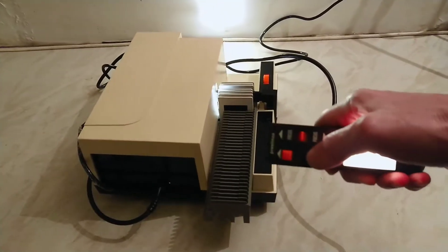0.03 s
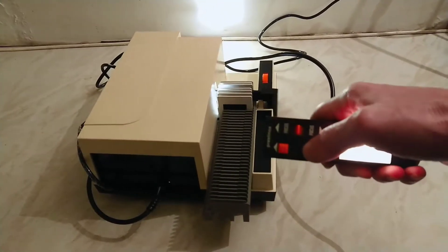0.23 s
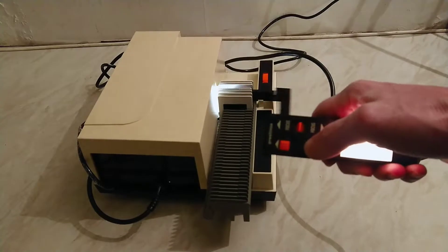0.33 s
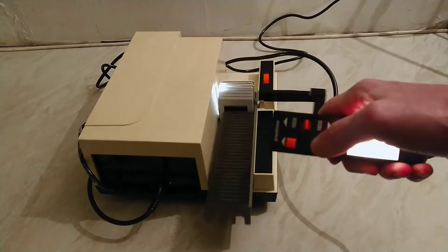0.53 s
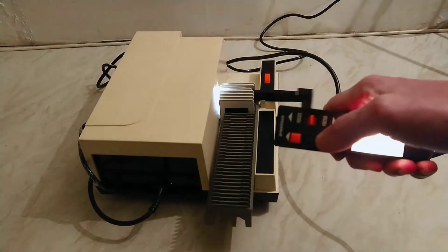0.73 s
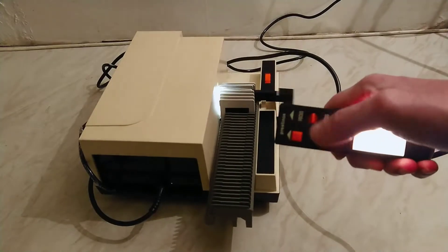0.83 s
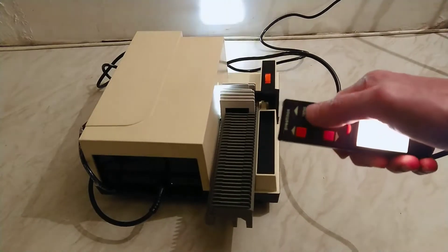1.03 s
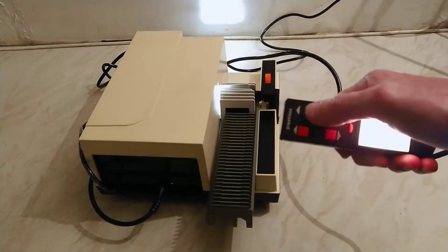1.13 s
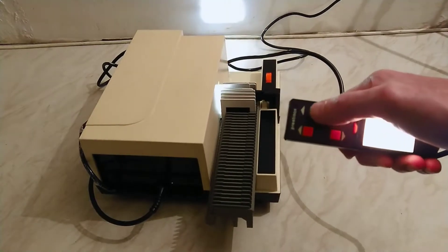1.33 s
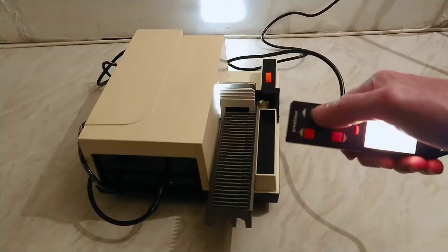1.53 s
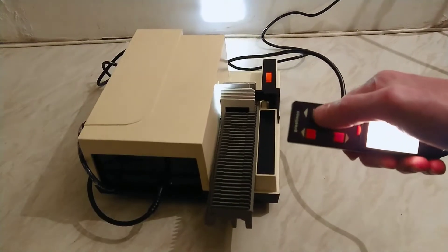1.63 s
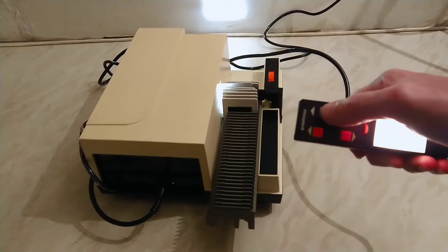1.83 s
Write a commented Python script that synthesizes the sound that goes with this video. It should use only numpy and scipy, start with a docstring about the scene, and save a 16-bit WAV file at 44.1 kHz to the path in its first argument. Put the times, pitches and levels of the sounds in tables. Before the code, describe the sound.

A slide projector changes one slide with plastic clacks and a whirr over its humming fan.

```python
"""A slide projector changes one slide

A cooling fan hums throughout. A steel latch snaps in, and a geared motor drives the slide arm
out and back with plastic clacks and scrapes. The machine bounces on the hard floor, then its
mechanism drops to rest with a last clack. A small bare room echoes the clacks, scrapes and ticks."""
import sys
import numpy as np
from scipy import signal
from scipy.fft import rfft, irfft, next_fast_len
from scipy.io import wavfile
from scipy.ndimage import map_coordinates

SR = 44100
rng = np.random.default_rng(int(sys.argv[2]) if len(sys.argv) > 2 else 0)


def dump(signal):
    """Clip the signal to [-1, 1] and save it as 16-bit WAV at the path in sys.argv[1]."""
    limited = np.clip(np.atleast_2d(signal).T, -1, 1)
    pcm = np.round(limited * 32767).astype(np.int16)
    wavfile.write(sys.argv[1], SR, pcm)


N = 83790

# How hard the motor works. Each row: time in seconds, load from 0 to 1.
MOTOR_LOAD = [(.25, 0.02), (.38, 1), (.7, 1), (1.0, 0.58), (1.12, 0)]


def amp(db):
    """Turn decibels (dB) into a multiplier."""
    return 10 ** (np.asarray(db) / 20)


def unit(x):
    """Scale a signal to an average power of 1."""
    return x / np.sqrt(np.mean(x ** 2) + 1e-20)


def along(points, hz):
    """Read between rows of (Hz, value) on a scale of octaves."""
    f, values = np.transpose(points)
    return np.interp(np.log(hz + 1), np.log(f + 1), values)


def curves(rows):
    """Join timed rows with straight lines: one curve for each column after the time."""
    times, *columns = np.transpose(rows)
    return [np.interp(np.arange(N) / SR, times, column) for column in columns]


def wobble(rate):
    """A smooth random curve through `rate` points a second."""
    return map_coordinates(rng.standard_normal(N // 8), [np.arange(N) * rate / SR + 2], mode="wrap")


def filtered(x, response):
    """Multiply each frequency f in x by response(f)."""
    n = x.shape[-1]
    padded = next_fast_len(n + 8192)
    return irfft(rfft(x, padded) * response(np.fft.rfftfreq(padded, 1 / SR)), padded)[..., :n]


def resonances(table, f):
    """How a body responds at frequency f, given rows of (pitch in Hz, width in Hz, dB)."""
    return sum((-1) ** k * amp(db) * 1j * f * width / (hz * hz - f * f + 1j * f * width)
               for k, (hz, width, db) in enumerate(table))


def noise(colour):
    """Two unrelated noises shaped by rows of (Hz, dB)."""
    return unit(filtered(rng.standard_normal((2, N)), lambda f: amp(along(colour, f))))


def narrow_noise(hz, width):
    """Two unrelated noises gathered around one pitch."""
    return unit(filtered(rng.standard_normal((2, N)), lambda f: resonances([(hz, width, 0)], f) ** 2))


def add(out, start, x):
    """Mix x into out from `start` seconds on."""
    part = out[..., max(round(start * SR), 0):][..., :x.shape[-1]]
    part += x[..., :part.shape[-1]]


def burst(t, db, ring_s, rise_s):
    """A quick swell and a fade. The ring time is how long a fade of 60 dB takes."""
    return amp(db - 60 * t / ring_s) * (1 - np.exp(-t / rise_s))


def struck(modes, hits, rise_s=0.00092):
    """A struck part rings at its own pitches, a little differently each time."""
    # Each row of modes: pitch in Hz, level in dB, ring time in seconds.
    # Each row of hits: start in seconds, level in dB.
    out, t = np.zeros((2, N)), np.arange(SR // 3) / SR
    for start, db in hits:
        for hz, mode_db, ring_s in modes:
            phase = rng.uniform(0, 2 * np.pi) + np.array([[0], [rng.choice([-1, 1]) * np.pi / 2]])
            level = burst(t, db + mode_db + rng.standard_normal(), ring_s, rise_s)
            add(out, start, level * np.sin(2 * np.pi * hz * t + phase))
    return out


def motor_tones(tones, sag_share=.026, waver_hz=2.5):
    """Wavering tones that drop in pitch as the load slows the motor."""
    load, = curves(MOTOR_LOAD)
    out = np.zeros((2, N))
    for hz, db in tones:
        cycles = np.cumsum(hz * (1 - sag_share * load) + waver_hz * wobble(35.16)) / SR
        level = np.sqrt(2) * amp(db + 1.9 * wobble(30.3))
        out[0] += level * np.sin(2 * np.pi * (cycles + rng.random()))
    return out


def fan(air_db=-49):
    """The fan pushes air through the case and vents while its blades hum."""
    # Rushing air. Each row: frequency in Hz, level in dB.
    air_colour = [(20, -62), (35, -35), (50, -11.5), (76, -24), (95, -10.5), (140, -6.5), (200, -9),
                  (270, -14), (335, -5), (384, -13), (427, -10), (490, -9), (560, -18), (641, -14.5),
                  (775, -19), (936, -13.5), (1070, -28), (1200, -19), (1520, -25), (2100, -30.5),
                  (3000, -39.5), (4200, -41.5), (5400, -53), (7400, -71), (11500, -66), (13000, -86),
                  (16000, -100)]
    # Air ringing in the case and vents. Each row: pitch in Hz, width in Hz, level in dB.
    vents = [(332, 37, -55.5), (471, 13, -62), (931, 36, -66), (975, 35, -67), (7210, 180, -86.5)]
    # The blade tone and its octave. Each row: pitch in Hz, level in dB.
    blade_tones = [(425.3, -51.5), (850.6, -64)]
    air = amp(air_db + 0.33 * wobble(12.1)) * noise(air_colour)
    ringing = sum(amp(db) * narrow_noise(hz, width) for hz, width, db in vents)
    return air + ringing + motor_tones(blade_tones)


def ticks(ring_s=0.039):
    """Loose parts tick faintly while the machine idles."""
    # The ticks. Each row: start in seconds, level in dB.
    hits = [(.11, -64), (1.334, -56.5), (1.37, -65), (1.635, -59), (1.813, -63.5)]
    # Their bright sound. Each row: frequency in Hz, level in dB.
    colour = [(1000, -17), (2700, 3), (3400, 10.5), (4200, -5), (5500, -2), (7500, -10), (11500, -9),
              (14000, -29)]
    level, t = np.zeros(N), np.arange(SR // 10) / SR
    for start, db in hits:
        add(level, start, amp(db - 60 * t / ring_s))
    return level * noise(colour)


def clacks(case_db=-4.5, chatter_db=1.5):
    """Each blow chatters and briefly rings the plastic case at many crowded pitches."""
    # Blows of the mechanism. Each row: start in seconds, level in dB,
    # extra dB for each of four bands from low to high, rise time in seconds.
    blows = [ (0.2188, -21, -20, -5, -4.5, -11, 0.0014), (0.223, -21.5, -24, -13, -6.5, -22, 0.00083),
             (0.2383, -19, -26, -4.5, -8, -7.5, 0.0029), (0.2474, -17, -14.5, -7, -6.5, -13.5, 0.0023),
             (0.337, -30.5, -21, -5, 1, -13, 0.0025), (0.3476, -23, -12, -3, -29, -19, 0.0013),
             (0.3669, -25, -11, -20, -6, -7, 0.0017), (0.403, -37, -9, -25, -3, -25, 0.00081),
             (0.5175, -23, -18, -2.5, -9.5, -16, 0.00043), (0.525, -22.5, -21, -7, -7.5, -13.5, 0.0011),
             (0.577, -24, -10, -12, -8, -14, 0.0005), (0.5936, -31.5, -17, 3, -5, -4, 0.0046),
             (0.681, -26, -7, -7.5, -12, -6.5, 0.0015), (.697, -21.5, -24, -11, -5.5, -7, 0.0026),
             (0.7042, -25.5, -16, -7, -1.5, -19, 0.0028), (0.7207, -22, -10.5, -18, -5, -14, 0.0041),
             (0.761, -28, -15, -3.5, -12, -21, 0.0023), (0.797, -29, -5, -0.5, -14, -11, 0.0044),
             (0.8374, -29, -6.5, -8.5, -15, -22, 0.0036), (1.079, -21.5, -24, -5, -8, -1.5, 0.011),
             (1.086, -23, -9.5, -2.5, -11.5, -5.5, 0.003), (1.102, -28, -15, -2.5, -8, -13, 0.00091),
             (1.1487, -37.5, -3.5, -2, -1, -17, 0.0038)]
    # The edges of those bands in Hz.
    band_edges = [250, 900, 2200, 5000, 16000]
    # The plastic's ring time in each band, in seconds.
    ring_s = [0.074, 0.055, 0.047, 0.057]
    # Where the case rings. Each row: pitch in Hz, width in Hz, level in dB.
    case_modes = [(920, 104, 3), (1228, 50, 8), (1600, 96, 7.5), (1990, 73, 4.5), (2445, 32, 1),
                  (3720, 70, -9.5), (4200, 150, 0), (7280, 130, 1)]
    # A clack's overall tone. Each row: frequency in Hz, level in dB.
    colour = [(200, -7), (263, -12), (325, 1), (380, -27), (430, -3.5), (560, -7), (916, -10.5),
              (1300, -11), (1770, -12), (2860, -6.5), (6300, -20.5), (7600, -17.5), (12500, -24.5),
              (16000, -26.5)]
    out, t = np.zeros((2, N)), np.arange(SR // 5) / SR
    case = lambda f: amp(along(colour, f)) * (.5 + amp(case_db) * abs(resonances(case_modes, f)))
    chatter = unit(amp(chatter_db * wobble(600)))
    for k, (low, high) in enumerate(zip(band_edges, band_edges[1:])):
        power = np.zeros(N)
        for start, db, *band_db, rise_s in blows:
            add(power, start, burst(t, db + band_db[k], ring_s[k], rise_s) ** 2)
        band = lambda f: case(f) / np.sqrt((1 + (low / (f + 1)) ** 10) * (1 + (f / high) ** 10))
        out += np.sqrt(power) * chatter * unit(filtered(rng.standard_normal((2, N)), band))
    return out


def latch():
    """The steel latch snaps and rings."""
    # Its ring. Each row: pitch in Hz, level in dB, ring time in seconds.
    modes = [(1590, 12, .15), (1688, 12.5, .15), (1888, 12, .16), (1962, 9, .15), (2032, 8, .18),
             (2150, 7, .1), (2411, 10, .09), (2560, 9, .09), (2774, 12.5, .13), (2878, 12, .13),
             (2949, 9, .16), (3209, 10, .18), (3252, 7.5, .15)]
    # Its snaps. Each row: start in seconds, level in dB.
    hits = [(.220, -41.5), (.249, -45), (0.709, -55)]
    return struck(modes, hits, rise_s=.004)


def drive(tooth_hz=114.9, grit_db=-18):
    """The motor rumbles through the floor; uneven gear teeth tap the chassis."""
    # Motor and gears. Each row: time in seconds, rumble in dB, whirr in dB.
    levels = [(.22, -83, -71), (.28, -45.5, -37.5), (.38, -42, -42.5), (.45, -48.5, -44.5),
              (.52, -52.5, -42), (.6, -44.5, -37), (.68, -51.5, -47.5), (.74, -50, -44), (.86, -50, -44),
              (1.0, -57, -46), (1.1, -51.5, -51.5), (1.2, -62, -82)]
    # The rumble. Each row: frequency in Hz, level in dB.
    rumble_colour = [(30, -29), (50, -64), (80, -5), (105, 3), (135, 2.5), (165, -4.5), (200, 3.5),
                     (260, -9.5), (400, -61)]
    # What the teeth set ringing. Each row: pitch in Hz, width in Hz, level in dB.
    modes = [(342, 18, -1), (416, 11.3, -1), (487.6, 29, -4), (581.7, 12.7, -7), (676.4, 60, -6.5),
             (870, 175, -14)]
    rumble_db, whirr_db = curves(levels)
    teeth_passed = np.cumsum(tooth_hz * (1 + .06 * wobble(40))) / SR
    taps = np.diff(np.floor(teeth_passed), prepend=0) * amp(2.9 * rng.standard_normal((2, N)))
    grit = amp(grit_db) * rng.standard_normal((2, N))
    body = lambda f: resonances(modes, f) / (1 + (f / 1600) ** 2) * (f > 70)
    whirr = unit(filtered(taps + grit, body))
    return amp(rumble_db) * noise(rumble_colour) + amp(whirr_db) * whirr


def sliding(slips_per_s=600, spread_db=2.5, rub_db=3.5):
    """The arm and slide scrape in their plastic guides: tiny slips over a smooth rub."""
    # The scrape's loudness. Each row: time in seconds, level in dB.
    levels = [(.23, -71.5), (.28, -42.5), (.33, -48.5), (.39, -41), (.45, -53), (.51, -53.5), (.57, -47),
              (.61, -38.5), (.675, -51.5), (.73, -46), (.81, -43), (.88, -50), (.98, -47.5), (1.06, -58),
              (1.2, -70)]
    # Its tone. Each row: frequency in Hz, level in dB.
    colour = [(410, -69), (700, -11), (1060, -6), (1600, -3), (1770, -7.5), (2050, -10.5), (2800, -14),
              (4320, -12.5), (5120, -20), (7290, -17), (15200, -32), (16000, -26)]
    level_db, = curves(levels)
    slips = (rng.random(N) < slips_per_s / SR) * amp(spread_db * rng.standard_normal(N))
    grains = unit(filtered(slips * rng.standard_normal((2, N)), lambda f: amp(along(colour, f))))
    return amp(level_db) * unit(grains + amp(rub_db) * noise(colour))


def whine():
    """The motor sings louder the harder it works."""
    # Its tones. Each row: pitch at idle in Hz, level at full load in dB.
    tones = [(579.6, -55), (425.6, -58.5)]
    load, = curves(MOTOR_LOAD)
    return load * motor_tones(tones)


def chassis():
    """Knocks ring the machine's hollow frame."""
    # Its ring. Each row: pitch in Hz, level in dB, ring time in seconds.
    modes = [(310.3, -3, 0.18), (345.3, -1, .15), (483, -3.5, 0.13)]
    # The knocks. Each row: start in seconds, level in dB.
    hits = [(.272, -33), (.592, -38), (.725, -33.5), (1.093, -31.5)]
    return struck(modes, hits)


def feet():
    """The machine bounces on its feet with low thumps."""
    # A thump. Each row: pitch in Hz, level in dB, ring time in seconds.
    modes = [(52.3, -21, 0.44), (109, -16.5, 0.53), (137.2, -7.5, 0.23)]
    # The bounces. Each row: start in seconds, level in dB.
    hits = [(.29, -44), (0.366, -32), (0.458, -36), (0.736, -39)]
    return struck(modes, hits)


def arm():
    """The slide arm rings when it is knocked."""
    # Its ring. Each row: pitch in Hz, level in dB, ring time in seconds.
    modes = [(1202, -1, 0.11), (1333, 2.5, 0.1), (1472, 4, 0.028), (1908, -2, 0.057), (2190, -15, 0.04),
             (2762, -8.5, 0.052)]
    # The knocks. Each row: start in seconds, level in dB.
    hits = [(0.349, -35), (.518, -29.5), (0.526, -37), (0.5771, -36.5), (0.725, -37.5), (1.09, -35)]
    return struck(modes, hits)


def catches(width_share=0.26):
    """The slide snags in its guide and slips free with a short, bright scrape."""
    # The snags. Each row: start in seconds, level in dB, centre pitch in Hz.
    snags = [(0.4106, -39, 5200), (0.4757, -42.5, 7440), (0.483, -42, 2500), (0.6966, -33.5, 8100),
             (.8627, -44, 8400), (0.9121, -40, 3900), (0.9562, -42.5, 4360)]
    out, t = np.zeros((2, N)), np.arange(N) / SR
    for start, db, hz in snags:
        add(out, start, burst(t, db, ring_s=0.041, rise_s=0.00064) * narrow_noise(hz, width_share * hz))
    return out


def slide_frame():
    """The slide's frame clicks against its guide."""
    # Its ring. Each row: pitch in Hz, level in dB, ring time in seconds.
    modes = [(3770, 4, 0.062), (4270, -5.5, 0.083), (5680, -10, 0.054)]
    # The clicks. Each row: start in seconds, level in dB.
    hits = [(.538, -37), (.682, -37), (.724, -36)]
    return struck(modes, hits)


def room(x, wall_delay_s=.006):
    """A soft echo whose bass lasts longest, a little different from moment to moment."""
    # The room's fade. Each row: frequency in Hz, ring time in seconds.
    ring_times = [(200, 0.46), (1500, 0.27), (4000, 0.25), (9000, 0.22), (16000, 0.34)]
    out, step = np.zeros((2, N)), SR // 8
    for start in range(0, N, step):
        hz, t, spectrum = signal.stft(rng.standard_normal((2, SR // 3)), SR, nperseg=256)
        fade = amp(-60 * t / along(ring_times, hz)[:, None])
        tail = signal.istft(spectrum * fade, SR, nperseg=256)[1]
        echo = signal.fftconvolve(x[:, start:start + step], tail / np.linalg.norm(tail[0]), axes=1)
        add(out, start / SR + wall_delay_s, echo)
    return out


def microphones(pair):
    """Two unrelated signals become left and right: alike in the bass, apart in the treble."""
    # How alike the sides are. Each row: frequency in Hz, likeness from -1 to 1.
    likeness = [(60, 0.83), (130, 0.99), (330, 0.92), (640, 0.39), (1400, -0.3), (3000, 0.094),
                (8000, -0.035)]
    # Which side is louder. Each row: frequency in Hz, left minus right in dB.
    balance = [(60, -5.5), (200, -1.5), (380, -3), (700, -4.5), (1300, 3), (2400, 0.5), (4400, 2),
               (8000, -2), (15000, 2)]
    angle = lambda f: np.arccos(np.clip(along(likeness, f), -1, 1)) / 2
    mid, side = filtered(pair, lambda f: np.array([np.cos(angle(f)), np.sin(angle(f))]))
    left_right = np.array([mid + side, mid - side])
    return filtered(left_right, lambda f: amp(along(balance, f) * np.array([[.5], [-.5]])))


def scene(room_db=-3):
    """The slide change in its room, over the fan."""
    mechanism = clacks() + sliding() + catches() + ticks()
    ringing = latch() + arm() + slide_frame()
    thumps = chassis() + feet()
    echo = amp(room_db) * room(mechanism)
    return microphones(mechanism + echo + ringing + thumps + drive() + whine() + fan())


def record(dry, top_hz=16150):
    """Cut away the very highest treble."""
    return filtered(dry, lambda hz: 1 / (1 + (hz / top_hz) ** 160))


dry = scene()
out = record(dry)
dump(out)
```